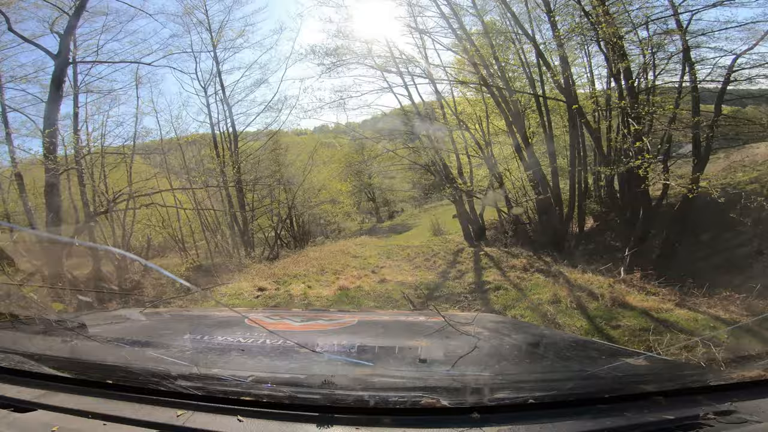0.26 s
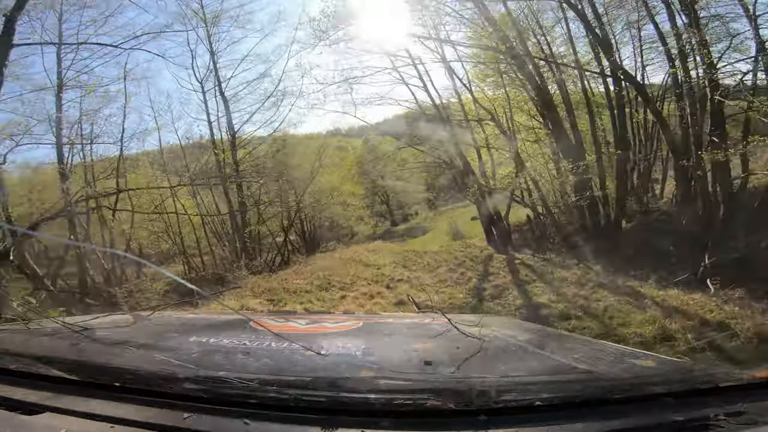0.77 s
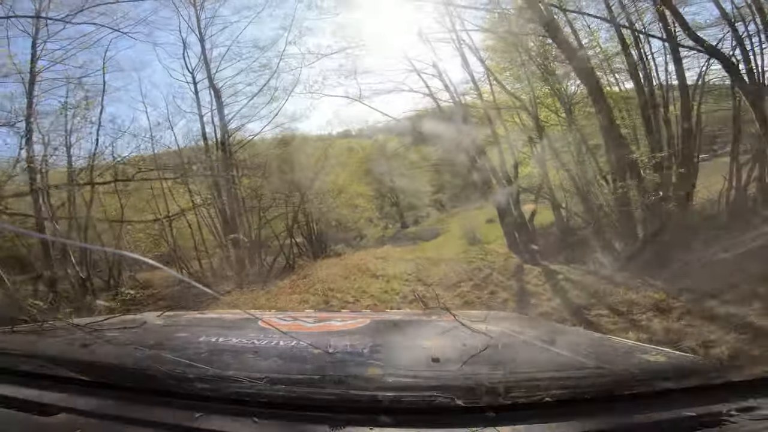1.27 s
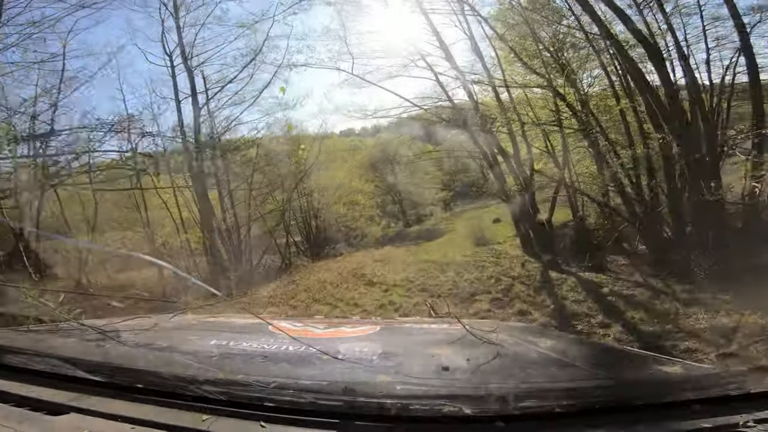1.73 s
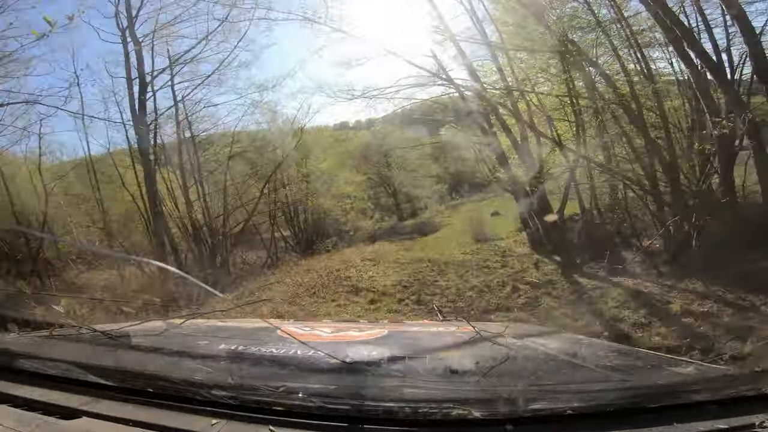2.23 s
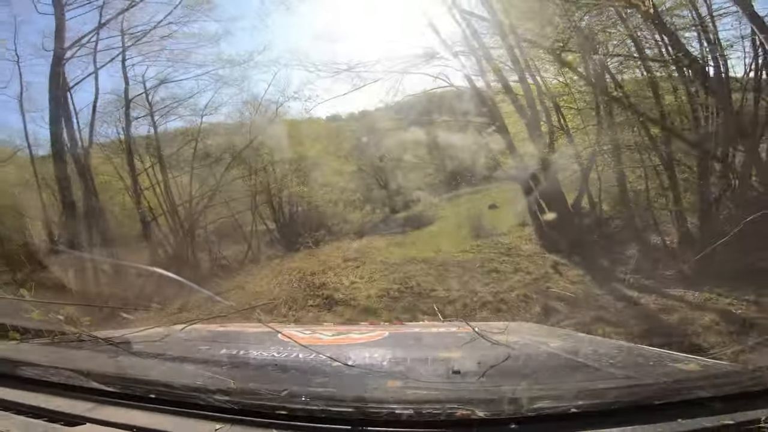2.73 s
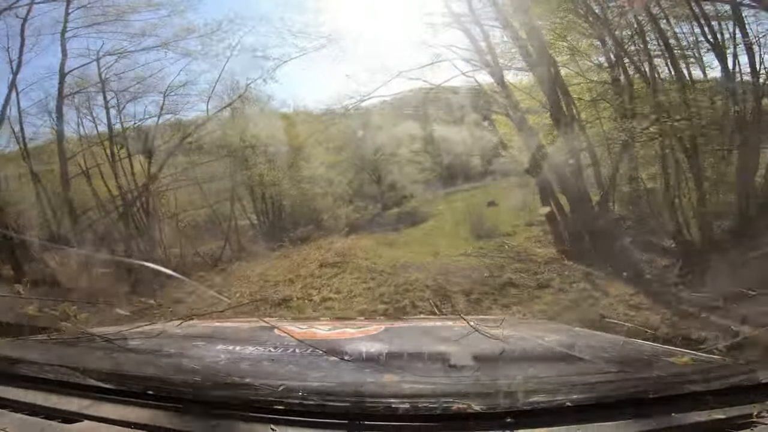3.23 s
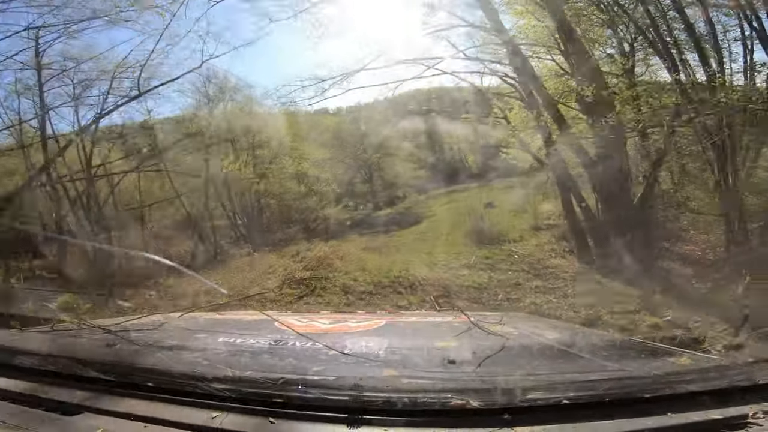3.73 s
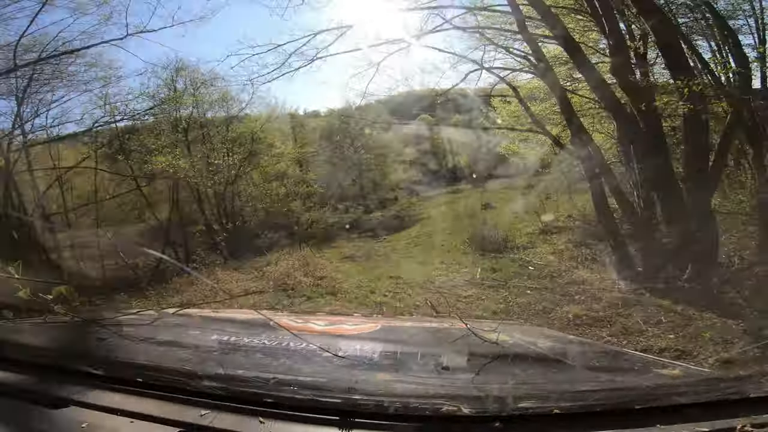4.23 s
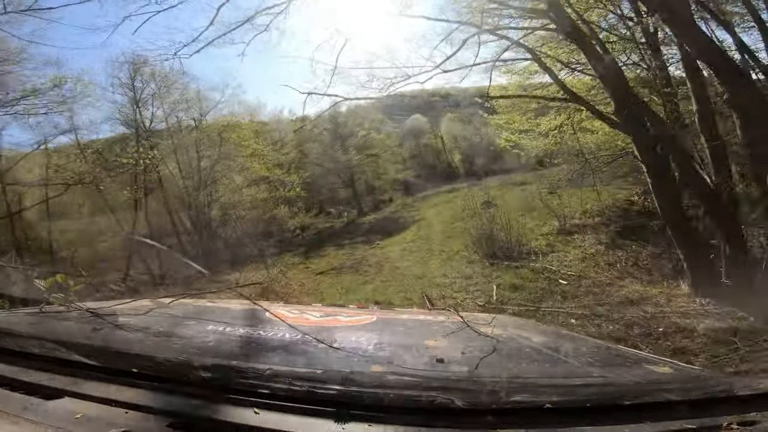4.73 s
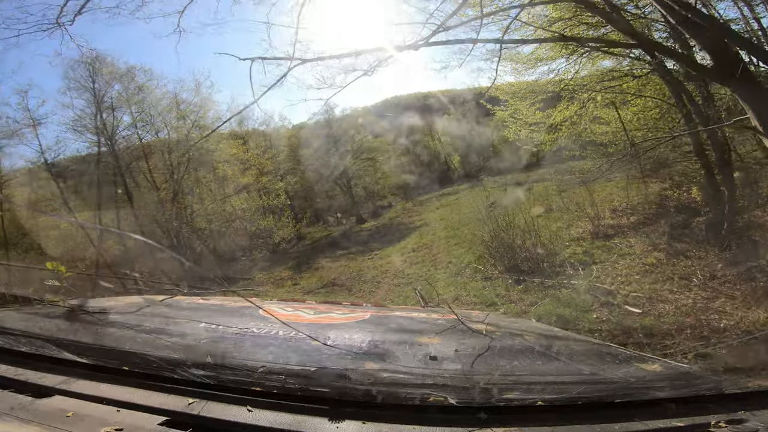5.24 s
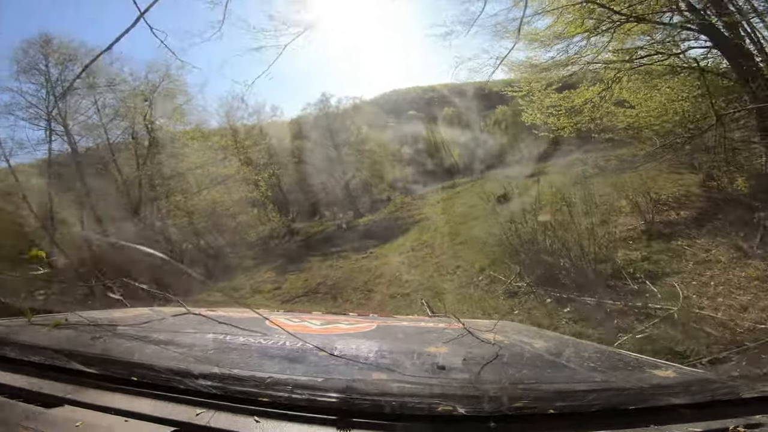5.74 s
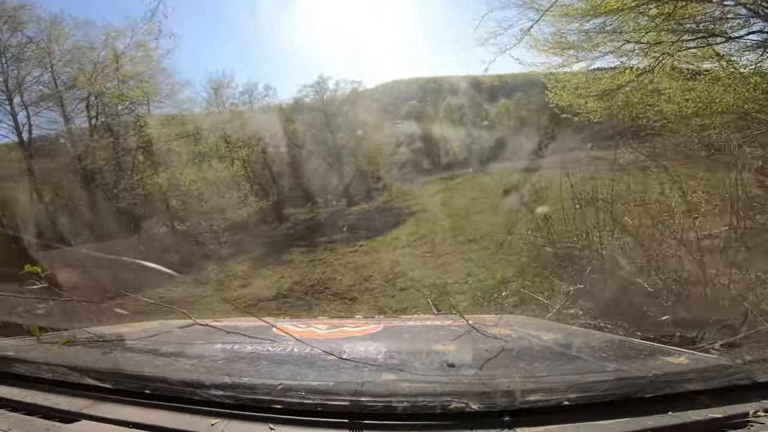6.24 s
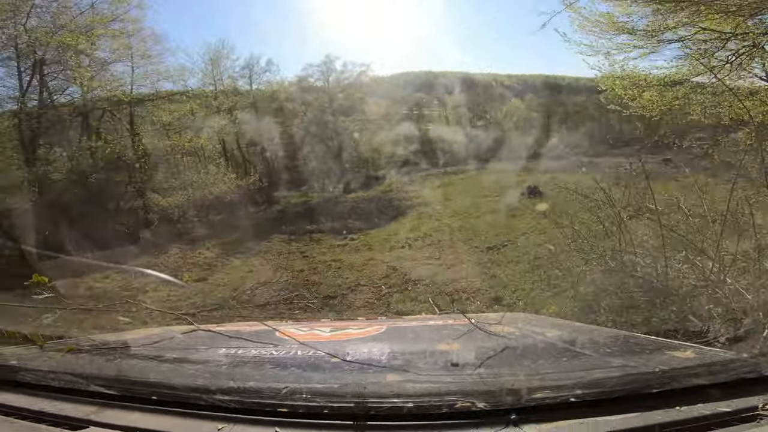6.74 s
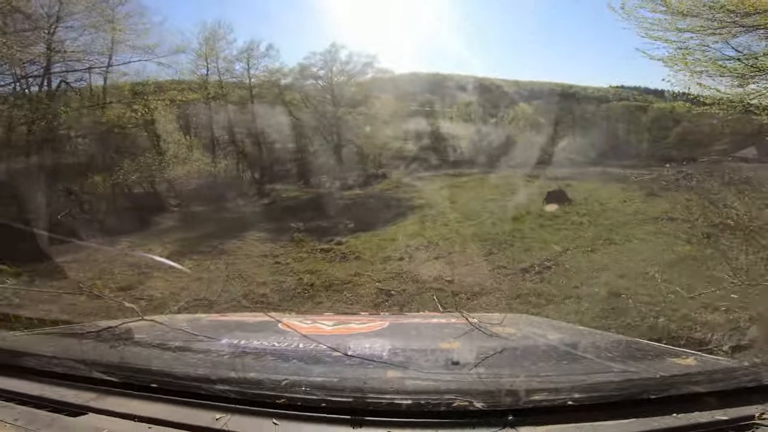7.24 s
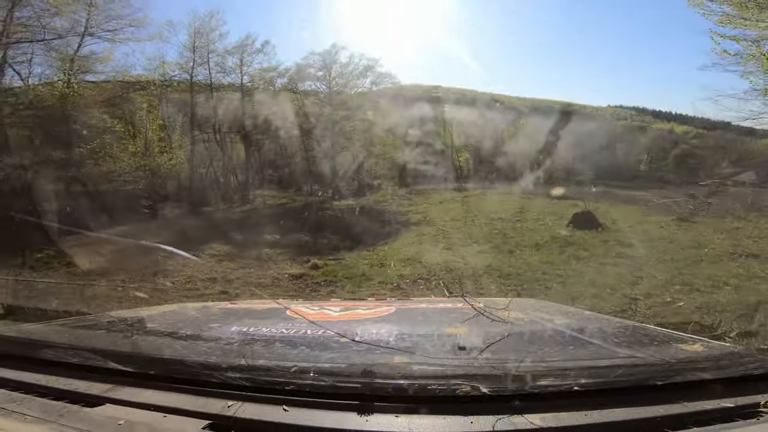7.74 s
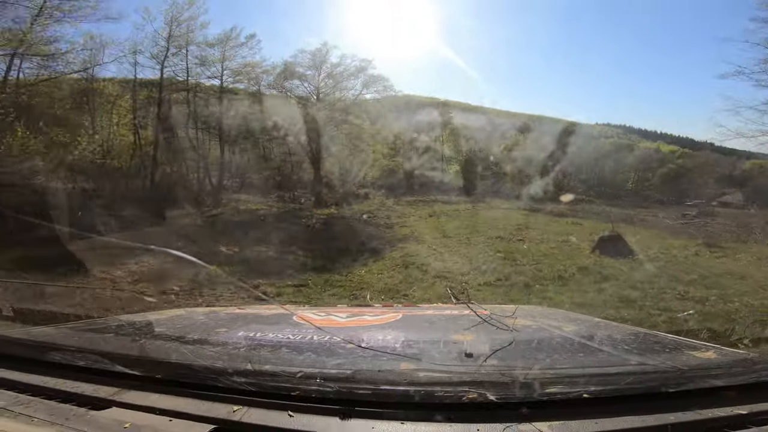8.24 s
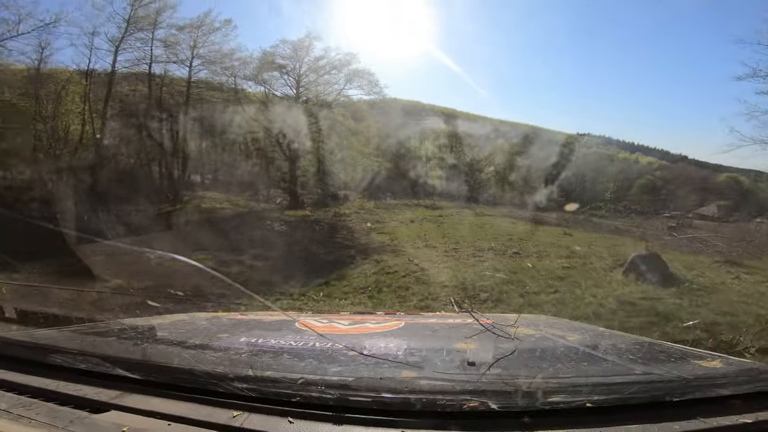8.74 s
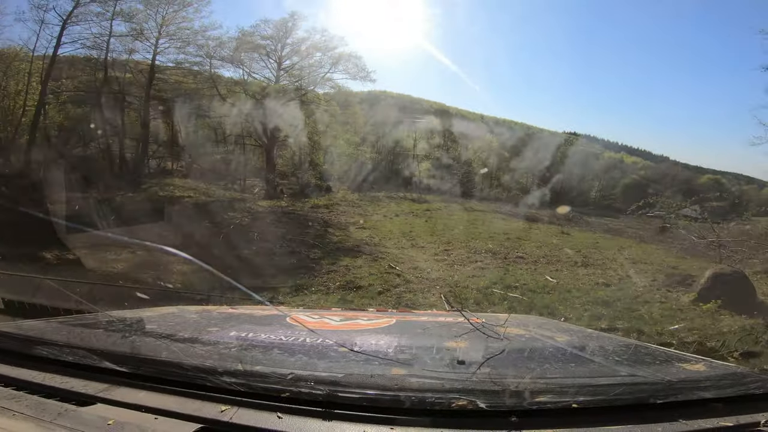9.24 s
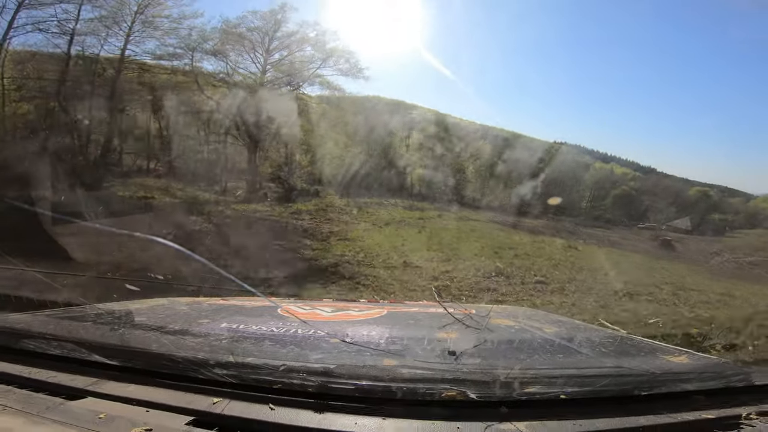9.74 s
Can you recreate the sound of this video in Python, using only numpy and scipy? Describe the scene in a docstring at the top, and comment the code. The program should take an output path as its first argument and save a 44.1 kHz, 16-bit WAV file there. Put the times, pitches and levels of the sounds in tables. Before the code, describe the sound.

Steady low engine drone and deep road rumble in a cabin, with leaves swishing past, branches scraping and snapping, then a busy run of body thumps and rattles.

```python
"""Inside a four-wheel-drive vehicle crawling through brush, the engine hums and booms over road rumble.
The engine is a stack of tones tied to the shaft speed; rumble, drumming and leaf swish are shaped noise.
Twig crackle, taps, snaps, scrapes and rattles of loose parts are built from tiny ringing grains.
A trim joint creaks in stick-slip pulses, a door knocks and the body thumps as struck, ringing panels.
Short narrow tones flutter, many near 7.7 kHz; the cabin walls add a short answer to the small sounds."""
import sys
import numpy as np
from scipy import signal
from scipy.fft import rfft, irfft, next_fast_len
from scipy.io import wavfile
from scipy.ndimage import uniform_filter1d, map_coordinates

SR = 44100
rng = np.random.default_rng(int(sys.argv[2]) if len(sys.argv) > 2 else 0)


def unload_audio(sound):
    """Save the sound as a 16-bit wav file, at the path given as the first command line argument."""
    columns = np.transpose(np.atleast_2d(sound))
    # keep every value between -1 and 1, then stretch to whole-number steps
    steps = np.round(np.clip(columns, -1, 1) * 32767)
    wavfile.write(sys.argv[1], SR, steps.astype(np.int16))


N = 440559  # length of the scene in samples

# Ground under the wheels: start_s, rumble_db, drumming_db, crackle_db
GROUND_LEVELS = [(0, -15.5, -34, -53.5), (1.3, -17, -34, -53.5), (3.3, -16.5, -31.5, -60),
                 (6, -17, -28, -56.5), (8.9, -14, -28, -50), (9.99, -14, -28.5, -66.5)]
# Rough stretches of brush: start_s, turning_s, end_s, rise_db (of the crackle)
# The row at 5.18 s has its last two times out of order, so it has no regular fall.
ROUGH_STRETCHES = [(1.9, 2.31, 2.8, 15), (2.5, 2.87, 3.02, 19.5), (5.18, 5.34, 5.29, 18.5),
                   (7.32, 7.51, 7.78, 10), (8.65, 8.9, 9.6, 9), (9.3, 9.54, 10.4, 18)]
# Dry leaves rustling: start_s, level_db
RUSTLE_LEVELS = [(0, -41.5), (.3, -57), (.7, -64.5), (1, -57), (1.3, -64), (2.6, -61), (3.4, -57),
                 (5.3, -46.5), (5.62, -53), (7.3, -55), (9.99, -61.5)]
# Tone colour of the road rumble: pitch_hz, level_db (per Hz, relative)
RUMBLE_COLOUR = [(8, -20.5), (20, 1.5), (40, 1.5), (70, -6.5), (120, -10.5), (180, -23), (300, -41),
                 (400, -120)]
# Tone colour of the drumming panels: pitch_hz, level_db (per Hz, relative)
DRUMMING_COLOUR = [(100, -13), (170, -9), (188, -11), (304, -19), (363, -16), (634, -29.5), (738, -25.5),
                   (987, -32), (3500, -47.5), (4550, -50.5), (7700, -120)]
# Tone colour of the rustling leaves: pitch_hz, level_db (per Hz, relative)
RUSTLE_COLOUR = [(1800, -43.5), (3000, -16.5), (4800, -3), (5700, -4), (6800, -5.5), (8600, -4),
                 (10500, -8.5), (12000, -18.5), (16000, -22.5)]
# How alike noise is at the two ears: pitch_hz, likeness (1 = identical)
EAR_LIKENESS = [(60, 0.98), (260, 0.97), (550, 0.71), (1100, 0.14), (10000, 0.15)]
# Leafy branches sweeping the side: start_s, loudest_s, end_s, level_db
LEAF_SWEEPS = [(-.1, 0.125, 0.29, -39), (0.64, 0.872, 0.98, -41.5), (0.998, 1.17, 1.27, -43.5),
               (5.792, 5.864, 5.96, -42.5), (8.842, 8.95, 9.3, -48)]
# Tone colour of a sweep: pitch_hz, level_db (per Hz, relative)
SWEEP_COLOUR = [(2000, -23), (3000, -7.5), (3800, -3.5), (5200, -8), (6500, -9), (9500, -13.5),
                (12000, -23.5)]
# Short narrow fluttering tones, many near 7.7 kHz, some low: start_s, length_s, pitch_hz, level_db
NARROW_TONES = [(2.53, 0.059, 2300, -50), (2.56, 0.051, 1710, -47), (4.106, 0.015, 1163, -32),
                (6.329, 0.021, 7827, -49), (6.33, 0.021, 6850, -59), (6.572, 0.032, 7700, -58),
                (6.961, 0.076, 7750, -48.5), (7.093, 0.069, 7840, -55), (7.143, 0.041, 6160, -57),
                (7.411, 0.028, 1700, -31), (7.491, 0.045, 7900, -51), (8.555, 0.044, 7704, -62),
                (8.778, 0.046, 7670, -56), (8.79, 0.027, 6200, -65), (8.91, 0.071, 7777, -53),
                (9.04, .035, 7750, -65), (9.305, .07, 6180, -64), (9.286, 0.084, 7620, -61),
                (9.505, 0.017, 9340, -41), (9.538, 0.039, 5500, -53), (9.702, 0.086, 7710, -65)]
# Branches scraping the paint: start_s, length_s, middle_pitch_hz, level_db
PAINT_SCRAPES = [(2.115, .075, 2940, -39), (2.211, 0.054, 2830, -34.5), (2.406, .04, 1535, -37),
                 (2.663, 0.038, 1430, -45.5), (2.746, .085, 1440, -41), (2.764, 0.027, 4200, -36)]
# Twigs and stones tapping the panels: start_s, level_db, middle_pitch_hz
PANEL_TAPS = [(2.084, -35.5, 1350), (2.131, -29, 850), (2.244, -33, 830), (2.259, -35, 890),
              (2.309, -29, 1150), (2.718, -26.5, 1250), (2.835, -31.5, 1180), (2.902, -39, 1300),
              (5.504, -29, 2130), (5.918, -23.5, 466), (7.538, -38, 3005), (7.585, -32, 3423),
              (7.646, -33, 3700), (7.67, -37, 1170), (8.958, -39, 2639), (9.056, -39, 3500),
              (9.123, -39, 3296), (9.296, -35.5, 3300), (9.616, -28, 1490)]
# Twigs snapping against the glass: start_s, level_db, lowest_hz, highest_hz, left_over_right_db
TWIG_SNAPS = [(2.47, -22.5, 890, 1910, 9), (5.1136, -25, 4000, 10500, -4), (5.134, -16, 4070, 6200, -1),
              (5.255, -21.5, 4860, 10910, -2), (5.3166, -20.5, 6200, 10900, -8),
              (5.5027, -16.5, 604, 10200, -3.5), (5.5315, -19.5, 6455, 11000, -3),
              (6.172, -22.5, 6000, 11110, -9), (6.9078, -15, 4340, 10600, -1.5)]
# Knocks on a door panel: start_s, level_db
DOOR_KNOCKS = [(1.891, -25.5), (2.04, -21.5), (3.045, -23.5), (6.21, -23), (6.328, -20), (7.169, -23),
               (7.892, -27), (8.754, -29), (8.871, -23), (8.952, -20), (9.087, -25), (9.261, -23),
               (9.393, -24), (9.533, -16.5), (9.9, -27)]
# Ringing modes of the door: pitch_hz, level_db, decay_s (time to fall 60 dB)
DOOR_MODES = [(460, -12, 0.024), (664, -1, 0.044), (1367, -10.5, 0.026), (2055, -14.5, 0.033)]
# Door chatter over rough ground: start_s, end_s, level_db
DOOR_CHATTER = (7.7, 9.75, -31.5)
# Creaks of the trim joint: start_s, level_db, length_s, pitch_factor, brightness_db (per octave)
TRIM_CREAKS = [(0.044, -19, 0.0091, 0.96, -1.9), (0.436, -22, 0.016, 0.946, 1),
               (0.89, -21.5, 0.018, 0.9, -4), (.931, -20.5, 0.0082, 1.02, 0),
               (1.069, -21, 0.044, 0.963, -0.5), (1.178, -23, 0.023, 0.99, 1.3),
               (1.216, -18, 0.02, 0.944, -0.5), (1.621, -21.5, 0.072, 1, -1.5),
               (2.936, -21.5, .012, 0.857, -1.5), (2.949, -17, 0.057, 0.983, -0.8),
               (3.171, -24, 0.016, 1.01, -0.5), (6.991, -25, 0.039, 0.924, 4.5),
               (7.374, -29.5, 0.03, 0.84, 1.5), (7.41, -25.5, 0.031, 0.87, 2)]
# Ringing modes of the trim: pitch_hz, width_hz, level_db
TRIM_MODES = [(326, 55, -6), (750, 210, -5.5), (1035, 380, -6.5), (1505, 255, -3.5), (2246, 340, 0.5),
              (3010, 370, -5.5), (4160, 450, 1.5), (5900, 1700, -1.5), (8130, 780, -10.5)]
# Rattles of twigs and loose parts: start_s, dull_db, middle_db, left_over_right_db
PART_RATTLES = [(0.27, -28, -44, 1), (1.567, -28, -46, 1.5), (2.115, -34.5, -44, 7), (2.154, -46, -32, 0),
                (2.189, -35, -37, 1), (2.226, -50, -31.5, 2), (2.34, -37, -29, 3), (2.388, -31, -37, 5),
                (2.461, -42, -33, 2), (2.715, -25.5, -31.5, 4), (3.369, -28.5, -51.5, -6),
                (4.111, -31, -44.5, -5), (5.178, -35, -44, -6), (5.325, -32, -48, -7),
                (5.395, -51, -42.5, -3), (6.326, -26, -43, -4.5), (6.38, -27, -42.5, -2.5),
                (7.044, -45, -41.5, -6), (7.668, -27, -52, 3.5), (7.805, -24.5, -45, -3),
                (7.839, -30, -46, 3), (7.918, -29.5, -47, 2), (8.011, -23, -36, 1), (8.095, -34, -47, 5),
                (8.151, -43, -41, 3), (8.414, -31, -35.5, -1), (8.521, -33, -49, 0), (8.79, -27.5, -41, 2),
                (8.88, -26.5, -46, -1), (9.017, -20.5, -44, -3), (9.461, -29, -42, -3),
                (9.531, -25, -44, 8), (9.567, -24, -35.5, 3.5), (9.632, -22.5, -32.5, -1),
                (9.964, -24, -35, 0)]
# Pitch ranges of the dull, middle and bright rattle grains: lowest_hz, highest_hz
RATTLE_RANGES = [(420, 1578), (1200, 4920), (5000, 10500)]
# Thumps of the body over bumps: start_s, level_db, pitch_hz
BODY_THUMPS = [(1.186, -17.5, 306), (4.114, -17, 260.8), (5.917, -17, 209.2), (5.934, -27, 400),
               (6.382, -20.5, 354), (7.725, -16.5, 309), (7.814, -16, 317.4), (8.032, -18.5, 297),
               (8.137, -17, 279), (8.452, -18, 179.2), (8.652, -17.5, 308), (8.761, -14, 298),
               (8.882, -16, 287), (9.014, -18.5, 279), (9.464, -14, 280.5), (9.543, -12.5, 280.5),
               (9.659, -17.5, 187.7)]
# Engine: start_s, shaft_hz (turns a second), hum_db (of the second order)
ENGINE_SPEED = [(0.0, 22.34, -13), (0.61, 24.15, -11), (1.32, 25.19, -16), (1.6, 23.84, -14.5),
                (1.93, 25.84, -16), (2.23, 24.29, -15), (2.62, 25.95, -21), (2.89, 25.28, -13),
                (3.22, 26.59, -16), (3.65, 27.16, -21.5), (4.05, 26.28, -17.5), (4.96, 26.74, -20.5),
                (5.4, 25.8, -19), (5.87, 25.38, -15.5), (6.28, 23.41, -14.5), (6.59, 26.81, -13),
                (6.89, 26.86, -24), (7.08, 28, -16.5), (7.72, 29.24, -17.5), (8.8, 27.37, -20.5),
                (9.9, 28.42, -23)]
# Other engine orders: multiple (of the shaft speed), level_db
ENGINE_ORDERS = [(1, -24.5), (3, -24.5), (4, -27.5), (5, -16.5), (6, -24.5), (8, -21.5), (9, -18),
                 (10, -22.5), (13, -23.5), (15, -24)]
# How the cabin passes engine tones, booming near 130 Hz: pitch_hz, gain_db
CABIN_GAIN = [(20, -8.5), (90, -6), (101, 3.5), (108, -2), (116, -17.5), (122, -11.5), (128, -2.5),
              (134, 1.5), (142, -3.5), (150, -13), (165, -21)]
# Microphone response in the treble: pitch_hz, gain_db
MIC_GAIN = [(9800, 0), (11000, -5.5), (13000, -7), (15500, -20.5)]

DRUM_SHARE, RUSTLE_SHARE = 0.17, 0.49  # part of a stretch's rise given to drumming and rustle
BUMP_DB = -11  # bumps relative to the drumming
WAVER_HZ = 65  # typical stray in the pitch of a narrow tone
SLIP_DB = -6.5  # one slip relative to the level of its creak
BRIGHT_DB = -7.5  # bright rattle grains relative to the middle ones
SPRAY_S, SPRAY_DECAY_S, SWELL_S = 0.045, 0.087, 0.0054  # longest spray, its 60 dB fall, its quick swell
LUG_HZ, LUG_DB_PER_HZ = 26.06, 1.19  # below this shaft speed the other orders gain level, above it they lose
PULSE_RAD = 2.0  # starting phase shared by all orders
BOOM_HZ, BOOM_WIDTH_HZ = 131, 6  # passing the boom turns a tone by half a cycle
TOP_HZ = 15800  # nothing is kept from here up


def amp(db):
    """Turn a level in dB into a gain."""
    return 10 ** (np.asarray(db) / 20)


def unit(x):
    """Scale x to an rms level of 1."""
    return x / np.sqrt(np.mean(x ** 2) + 1e-20)


def along(points, hz):
    """Read a curve of (Hz, value) points on a logarithmic pitch axis."""
    point_hz, values = np.transpose(points)
    return np.interp(np.log(hz + 1), np.log(point_hz + 1), values)


def curves(rows):
    """Draw one value per sample for each column after the time."""
    s, *columns = np.transpose(rows)
    return [np.interp(np.arange(N) / SR, s, column) for column in columns]


def swell(rows, power=1):
    """Add up straight-line curves through zero, a height and zero at each row's three times."""
    t = np.arange(N) / SR
    return sum(height * np.interp(t, (first, second, third), (0, 1, 0)) ** power
               for first, second, third, height in rows)


def wobble(rate):
    """Make a smooth random curve with this many random points a second."""
    points = rng.standard_normal(int(N * rate / SR) + 4)
    return map_coordinates(points, [np.arange(N) * rate / SR])


def filtered(x, response):
    """Shape x by a gain that depends on frequency."""
    size = next_fast_len(N + SR // 2)
    spectrum = rfft(x, size) * response(np.fft.rfftfreq(size, 1 / SR))
    return irfft(spectrum, size)[..., :N]


def rush(colour, grit_db):
    """Make stereo noise of rms 1; grit makes its level uneven, like a stream of grains."""
    pair = rng.standard_normal((2, N)) * amp(grit_db * wobble(300))

    def middle_and_side(hz):
        # this angle splits the noise so that the ears are as alike as the table says
        angle = np.arccos(np.clip(along(EAR_LIKENESS, hz), -1, 1)) / 2
        return amp(along(colour, hz)) * [np.cos(angle), np.sin(angle)]

    middle, side = filtered(pair, middle_and_side)
    return unit(np.array([middle + side, middle - side]))


def add(track, s, sound):
    """Mix a short sound into a track at s seconds."""
    part = track[..., round(s * SR):][..., :sound.shape[-1]]
    part += sound[..., :part.shape[-1]]


def grains(s, db, pan_db, low_hz, high_hz, cycles):
    """Make tiny stereo impacts, each ringing at its own random pitch for a few cycles."""
    chance = rng.random((len(s), 3))
    hz = low_hz * (high_hz / low_hz) ** chance[:, :1]
    t = np.arange(int(3 * SR * cycles / low_hz)) / SR
    # samples past the end all land in one spare slot, which is cut off
    index = np.clip((s * SR).astype(int)[:, None] + np.arange(len(t)), 0, N).ravel()
    shape = np.exp(-t * hz / cycles) * (1 - np.exp(-t * hz / 0.061))
    uneven_db = -2.07 * np.log(1 - chance[:, 2]) - 1.48 * chance[:, 0]  # higher grains are weaker
    out = []
    for ear in (1, -1):  # left, right
        ring = shape * np.sin(2 * np.pi * hz * t + ear * 2.0 * (chance[:, 1:2] - 0.5))
        level = amp(db + ear * pan_db / 2 + uneven_db)
        out.append(np.bincount(index, (ring * level[:, None]).ravel(), N + 1)[:N])
    return np.array(out)


def ground():
    """Rumble comes through the axles, panels drum and bump, twigs crackle and dry leaves rustle."""
    rumble_db, drumming_db, crackle_db = curves(GROUND_LEVELS)
    rough_db = swell(ROUGH_STRETCHES)
    drumming_db = drumming_db + DRUM_SHARE * rough_db
    rustle_db = curves(RUSTLE_LEVELS)[0] + RUSTLE_SHARE * rough_db

    rumble = amp(rumble_db) * rush(RUMBLE_COLOUR, grit_db=-0.9)
    drumming = amp(drumming_db) * unit(amp(3.05 * wobble(25)) * rush(DRUMMING_COLOUR, grit_db=1.0))

    twig_s = rng.random(9000) * N / SR
    twig_db = (crackle_db + rough_db + 2.96 * wobble(30))[(twig_s * SR).astype(int)]
    twig_pan_db = rng.normal(-1.5, 4, len(twig_s))
    crackle = grains(twig_s, twig_db, twig_pan_db, low_hz=796, high_hz=4150, cycles=3.17)

    bump_s = rng.random(350) * N / SR
    bump_db = drumming_db[(bump_s * SR).astype(int)] + BUMP_DB
    bumps = grains(bump_s, bump_db, -1.5 + 0 * bump_s, low_hz=262.0, high_hz=1310, cycles=5.4)

    rustle_level = amp(rustle_db + 2.0 * wobble(28) + [[-1.2], [1.2]])
    rustle = rustle_level * rush(RUSTLE_COLOUR, grit_db=1.5)
    return rumble + drumming + crackle + bumps + rustle


def sweeps():
    """Leaves drag along the side: a hiss that swells and lets go."""
    rows = [(start, top, end, amp(db)) for start, top, end, db in LEAF_SWEEPS]
    stroke = swell(rows, power=0.86)
    return stroke * amp([[-1.1], [1.1]]) * rush(SWEEP_COLOUR, grit_db=1.7)


def narrow_tones():
    """Short sine tones flutter in pitch and level as smooth random curves move them."""
    out, drift, flutter = np.zeros((2, N)), wobble(150), wobble(120)
    for s, length, hz, db in NARROW_TONES:
        i = round(s * SR) + np.arange(round(length * SR))
        phase = 2 * np.pi * np.cumsum(hz + WAVER_HZ * drift[i]) / SR
        tone = np.sin(phase + [[0], [1.5]])  # the right ear runs ahead in phase
        fade = np.sqrt(np.hanning(len(i)))
        add(out, s, 2 * amp(db + 2.5 * flutter[i]) * fade * tone)
    return out


def scrapes():
    """A branch on paint is a dense run of grains near one pitch, leaning left."""
    out = 0
    for s, length, hz, db in PAINT_SCRAPES:
        u = rng.random(int(length * 2500))  # place within the scrape, 0 to 1
        level_db = db + 9 * np.log10(np.sin(np.pi * u ** 0.6) + 0.1)
        out = out + grains(s + u * length, level_db, 2.5 + 0 * u, hz / 1.18, hz * 1.19, cycles=2.7)
    return out


def taps():
    """A tap is a handful of grains around its pitch, all struck within 9 ms."""
    out = 0
    for s, db, hz in PANEL_TAPS:
        late = 0.009 * rng.random(12) ** 3
        level_db = db - 4.5 - 600 * late
        out = out + grains(s + late, level_db, -1.5 + 0 * late, hz / 1.42, hz * 1.6, cycles=5.3)
    return out


def snaps():
    """A snapping twig is a tight bunch of very short grains."""
    out, bunch = 0, np.ones(40)
    for s, db, low_hz, high_hz, pan_db in TWIG_SNAPS:
        times = s + 0.0018 * rng.random(len(bunch)) ** 2
        grain_db = (db - 10 * np.log10(len(bunch))) * bunch  # share the power among the grains
        out = out + grains(times, grain_db, pan_db * bunch, low_hz, high_hz, cycles=2.35)
    return out


def knocks():
    """Each knock rings the door's modes anew, leaning right; weaker ones chatter over rough ground."""
    out, t = np.zeros(N), np.arange(SR // 10) / SR
    start, end, chatter_db = DOOR_CHATTER
    chatter = [(start + (end - start) * when, chatter_db + 8 * (size - 0.5))
               for when, size in rng.random((50, 2))]
    for s, db in list(DOOR_KNOCKS) + chatter:
        ring = 0
        for hz, mode_db, decay_s in DOOR_MODES:
            fade = amp(db + mode_db + rng.normal(0, 0.67) - 60 * t / decay_s)
            ring = ring + fade * np.sin(2 * np.pi * hz * rng.normal(1, 0.031) * t)
        add(out, s, ring * (1 - np.exp(-t / 0.00061)))
    return out * amp([[-2.5], [2.5]])


def creaks():
    """The trim joint sticks and slips; each slip rings the trim's modes, leaning right."""
    out, t = np.zeros((2, N)), np.arange(SR // 25) / SR
    for s, db, length, pitch, bright_db in TRIM_CREAKS:
        u = np.arange(round(length * SR)) / (length * SR)
        chance = rng.standard_normal((3, SR // 10))[:, :len(u)]
        # a slip falls wherever the running count, at a rate jittering around 330 a second, steps up
        count = np.floor(np.cumsum(330 * amp(8 * chance[0])) / SR - 1e-6)
        slips = np.minimum(np.diff(count, prepend=-2), 1)
        drive = slips * amp(2.0 * chance[1]) + 0.089 * chance[2]
        drive *= np.minimum(1, 0.51 + 3 * u) * np.minimum(1, 3.0 * (1 - u))

        phases = rng.uniform(-0.9, 0.9, (len(TRIM_MODES), 1, 1)) * [[1], [-1]]  # each ear hears its own mix
        ring = 0
        for (hz, width_hz, mode_db), phase in zip(TRIM_MODES, phases):
            level = amp(mode_db + bright_db * np.log2(hz / 2000) + rng.normal(0, 0.57))
            tone = np.sin(2 * np.pi * hz * pitch * t + phase)
            ring = ring + level * np.exp(-np.pi * width_hz * t) * tone
        ring = ring * (1 - np.exp(-t / 0.00008))
        tick = uniform_filter1d(rng.standard_normal((2, len(t))), size=4)
        ring += 1.2 * amp(-60 * t / 0.0031) * tick  # a dry tick between the modes
        add(out, s, amp(db + SLIP_DB) * signal.fftconvolve(drive[None], ring, axes=1))
    return out * amp([[-2.2], [2.2]])


def rattles():
    """Each rattle is a dying spray of dull, middle and bright grains, after a quick swell."""
    s, dull_db, middle_db, pan_db = np.transpose(PART_RATTLES)[:, :, None]
    levels = (dull_db, middle_db, middle_db + BRIGHT_DB)
    ring_cycles, grain_counts = (5.5, 7.5, 7), (16, 60, 60)
    out = 0
    for (low_hz, high_hz), db, cycles, count in zip(RATTLE_RANGES, levels, ring_cycles, grain_counts):
        late = rng.random((len(s), count)) ** 2.2 * SPRAY_S
        swell_db = 20 * np.log10(1.3 - np.exp(-late / SWELL_S))
        level_db = db - 60 * late / SPRAY_DECAY_S + swell_db
        pans = (pan_db + 0 * late).ravel()
        out = out + grains((s + late).ravel(), level_db.ravel(), pans, low_hz, high_hz, cycles)
    return out


def thumps():
    """A soft blow rings a floor panel and its weaker upper mode for a short time."""
    out, t = np.zeros(N), np.arange(SR // 6) / SR
    blow = amp(-60 * t / 0.11) * (1 - np.exp(-t / 0.0024))
    for s, db, hz in BODY_THUMPS:
        upper = 0.81 * amp(-60 * t / 0.019) * np.sin(2 * np.pi * 2.12 * hz * t)
        ring = np.sin(2 * np.pi * hz * t) + upper
        add(out, s, amp(db) * blow / blow.max() * ring)
    return out


def engine():
    """Shaft orders are slightly unsteady tones, louder where they cross a cabin resonance."""
    shaft_hz, hum_db = curves(ENGINE_SPEED)
    load_db = LUG_DB_PER_HZ * (LUG_HZ - shaft_hz)
    angle = 2 * np.pi * np.cumsum(shaft_hz * (1 + 0.002 * wobble(12))) / SR
    out = amp(hum_db + 1.83 * wobble(9)) * np.cos(2 * angle + PULSE_RAD)
    for multiple, db in ENGINE_ORDERS:
        order_hz = multiple * shaft_hz
        lag = np.pi / 2 + np.arctan((order_hz - BOOM_HZ) / BOOM_WIDTH_HZ)
        level = amp(db + load_db + along(CABIN_GAIN, order_hz) + 1.83 * wobble(6))
        out += level * np.cos(multiple * angle + PULSE_RAD - lag)
    return np.sqrt(2) * out


def cabin(x):
    """Cabin walls give a short answer, different at each ear and renewed every 40 ms."""
    out, t, step = x.copy(), np.arange(SR // 8) / SR, SR // 25
    for i in range(0, N, step):
        tail = rng.standard_normal((2, len(t))) * amp(-60 * t / 0.08)
        tail = tail / np.linalg.norm(tail[0])
        add(out, i / SR, amp(-2.5) * signal.fftconvolve(x[:, i:i + step], tail, axes=1))
    return out


def scene():
    """Mix everything heard behind the windscreen; the pairs of gains are left and right in dB."""
    road = ground() * amp([[-0.35], [0.35]])
    body = thumps() * amp([[-0.9], [0.9]])
    motor = engine() * amp([[-0.4], [0.4]])
    small_sounds = narrow_tones() + scrapes() + taps() + snaps() + knocks() + creaks() + rattles()
    return road + sweeps() + cabin(small_sounds) + body + motor


def record(dry):
    """The microphone rounds off the highest peaks, fades in the top octave and stops at its band limit."""
    soft = dry / (1 + np.abs(dry / 0.88) ** 6) ** (1 / 6)
    return filtered(soft, lambda hz: amp(along(MIC_GAIN, hz)) * (hz < TOP_HZ))


dry = scene()
out = record(dry)
unload_audio(out)
```